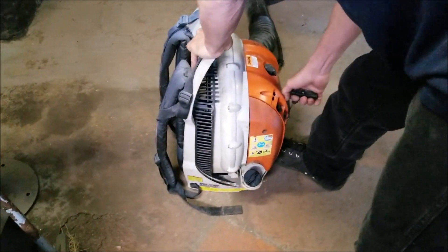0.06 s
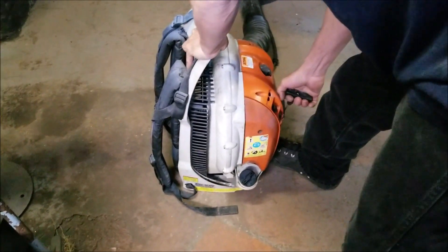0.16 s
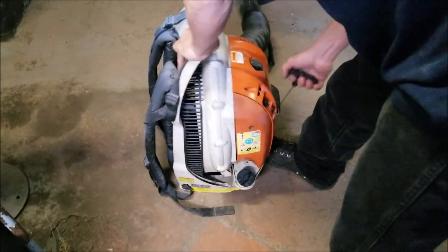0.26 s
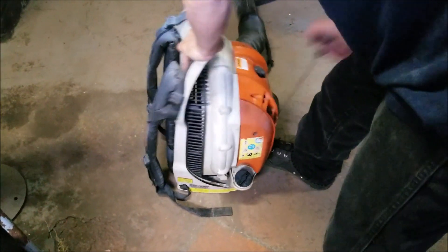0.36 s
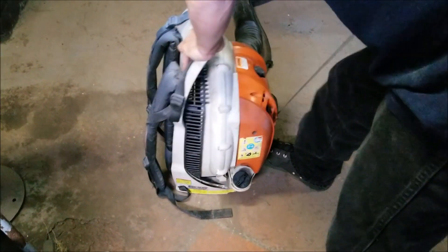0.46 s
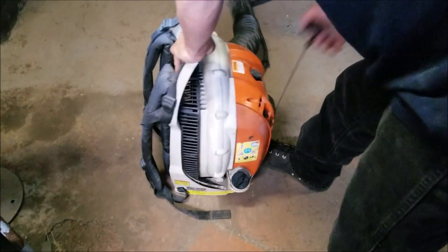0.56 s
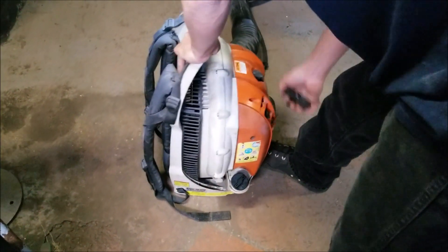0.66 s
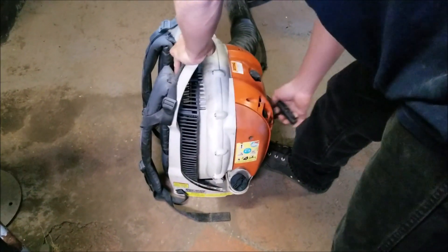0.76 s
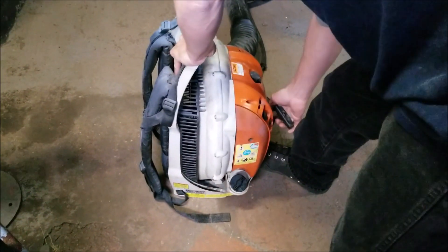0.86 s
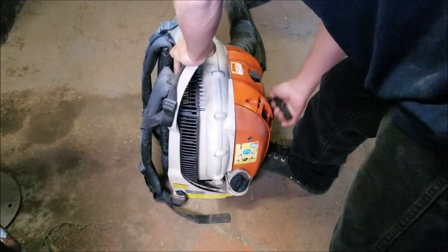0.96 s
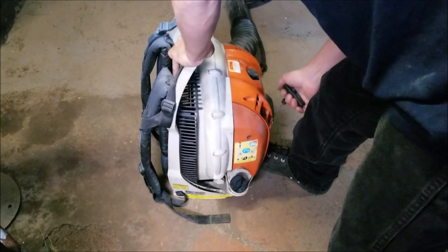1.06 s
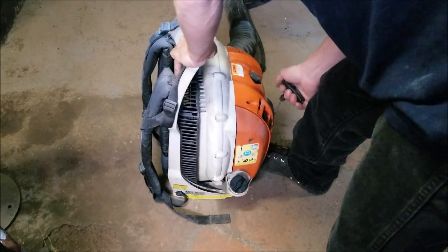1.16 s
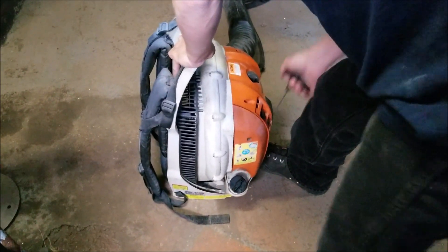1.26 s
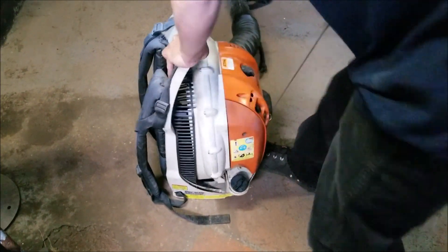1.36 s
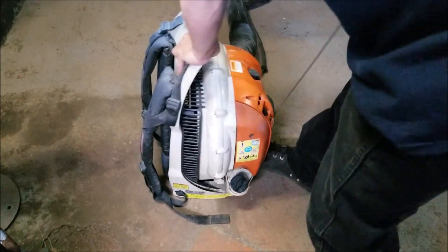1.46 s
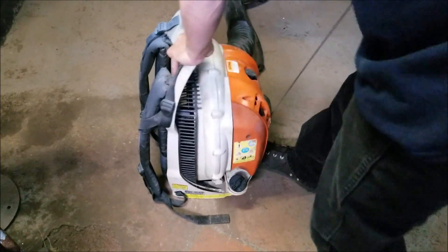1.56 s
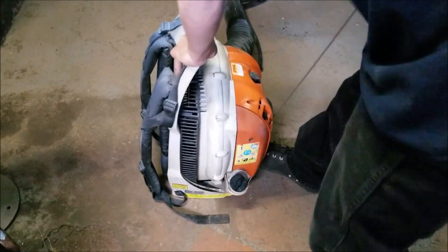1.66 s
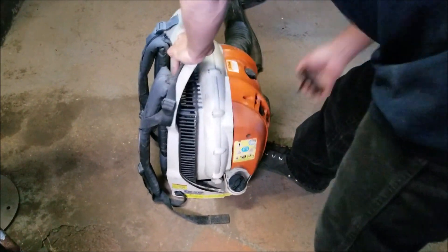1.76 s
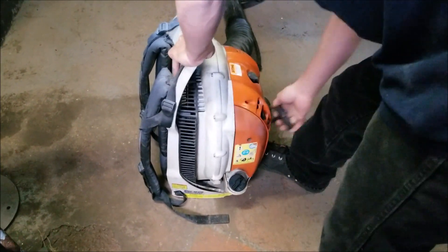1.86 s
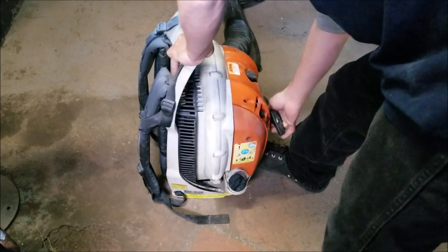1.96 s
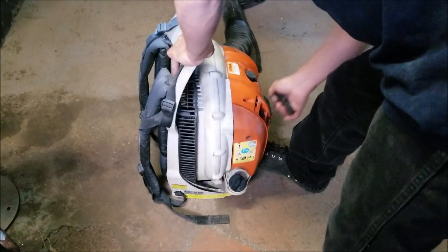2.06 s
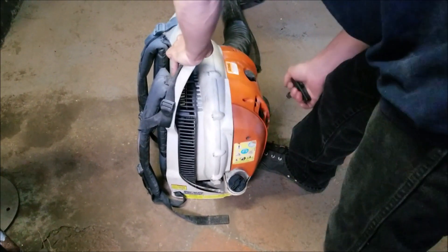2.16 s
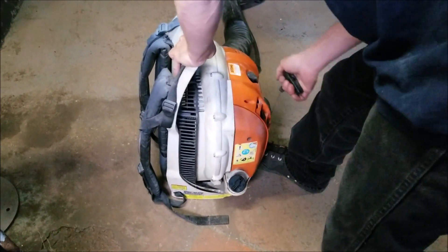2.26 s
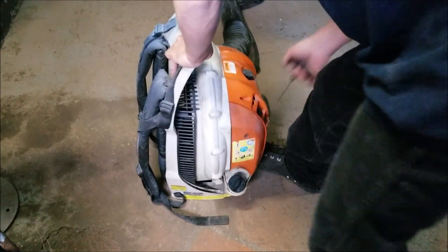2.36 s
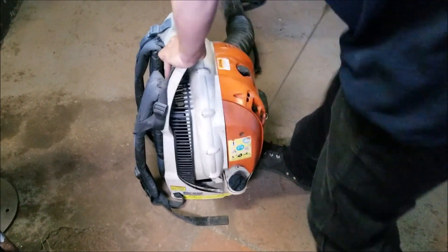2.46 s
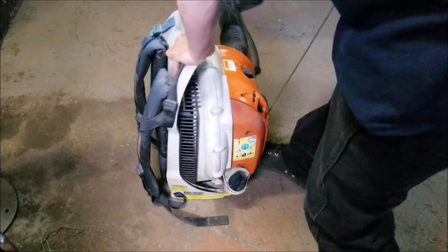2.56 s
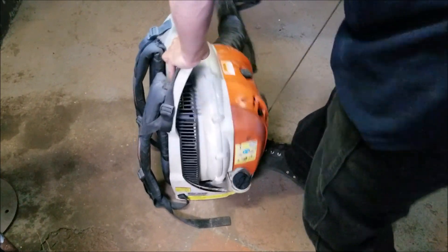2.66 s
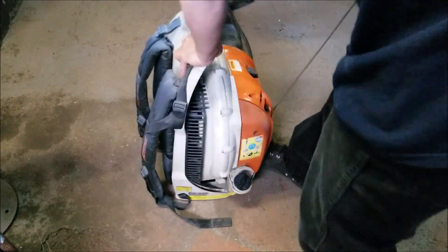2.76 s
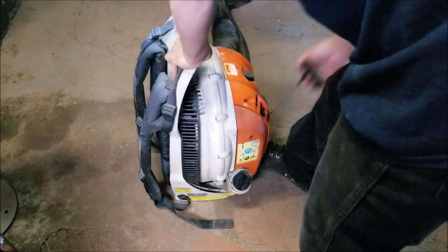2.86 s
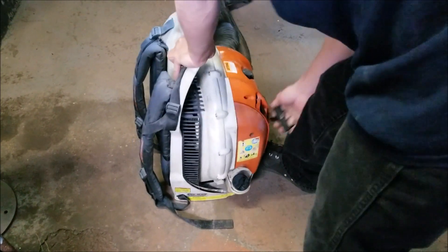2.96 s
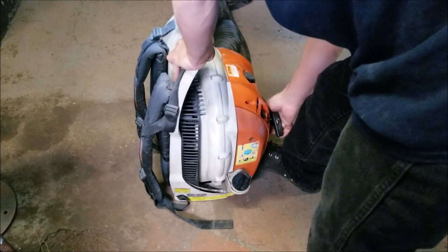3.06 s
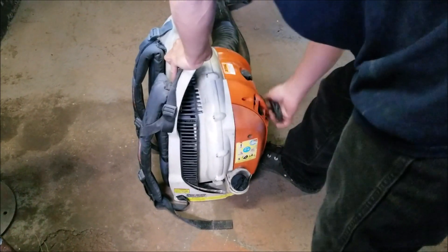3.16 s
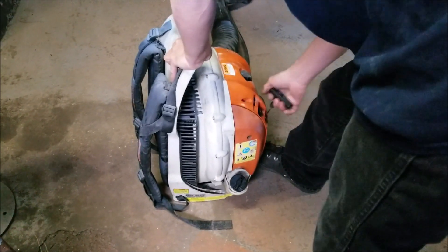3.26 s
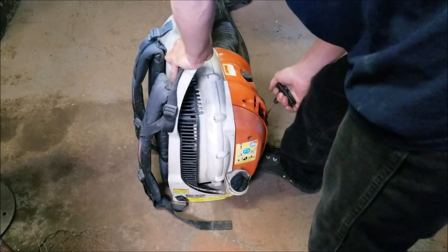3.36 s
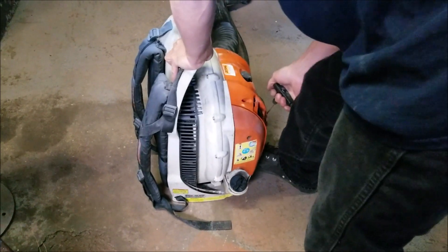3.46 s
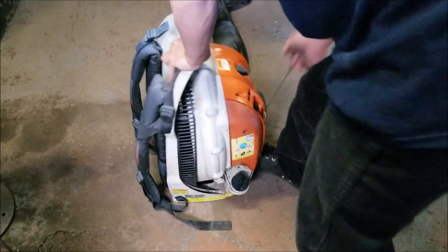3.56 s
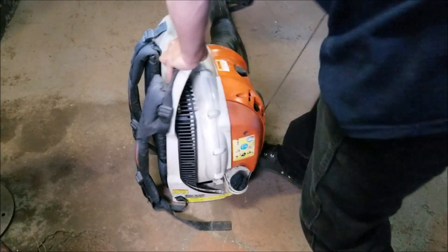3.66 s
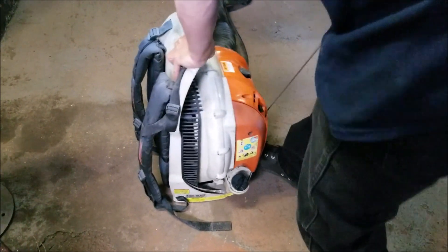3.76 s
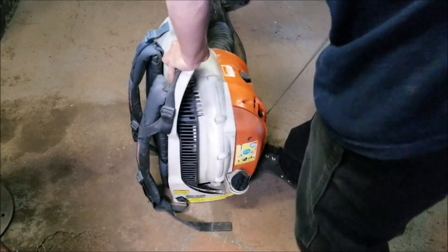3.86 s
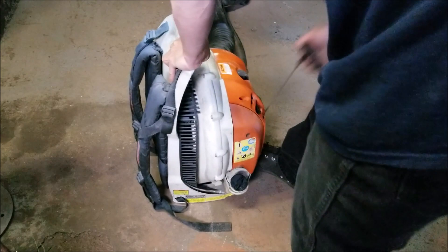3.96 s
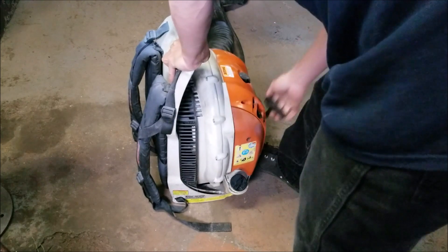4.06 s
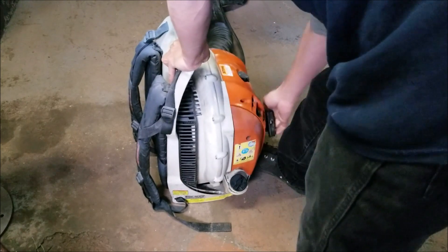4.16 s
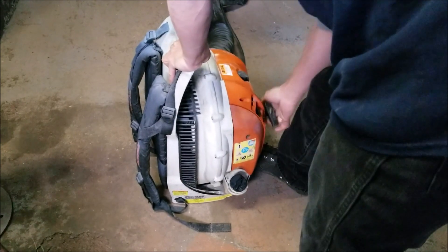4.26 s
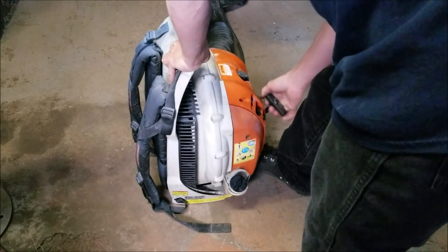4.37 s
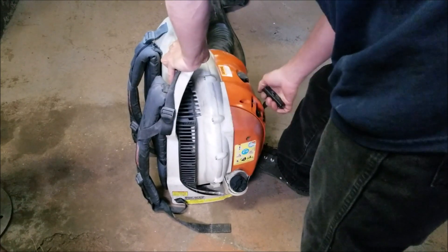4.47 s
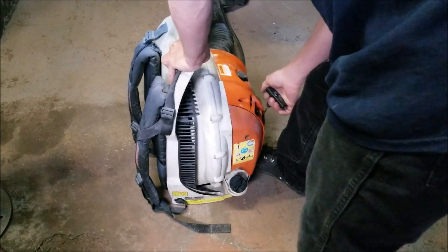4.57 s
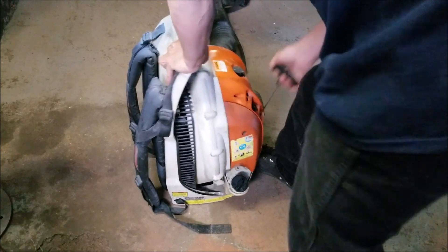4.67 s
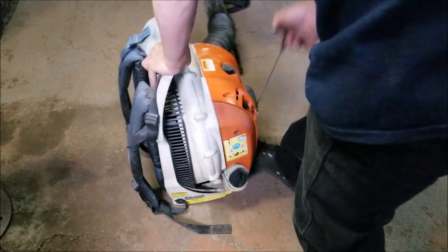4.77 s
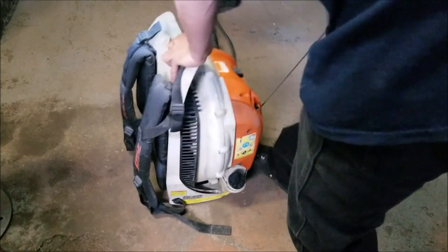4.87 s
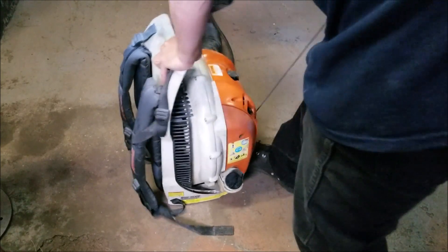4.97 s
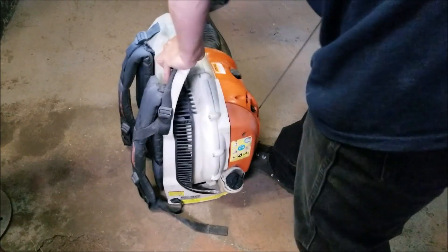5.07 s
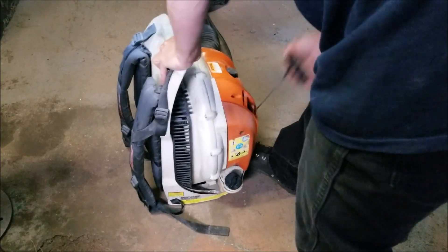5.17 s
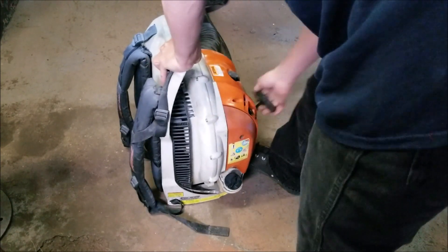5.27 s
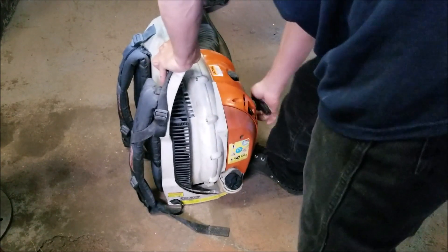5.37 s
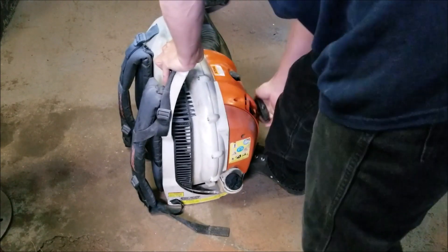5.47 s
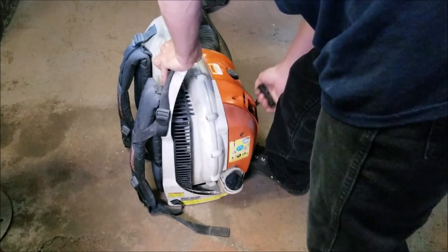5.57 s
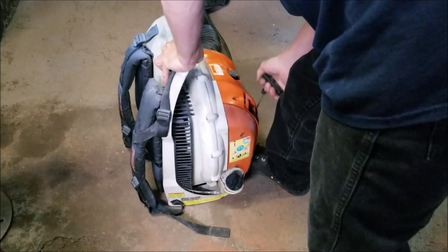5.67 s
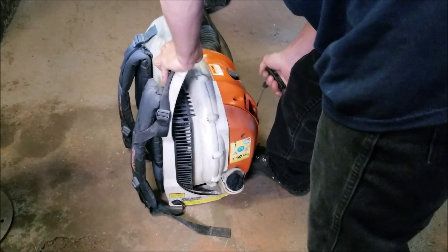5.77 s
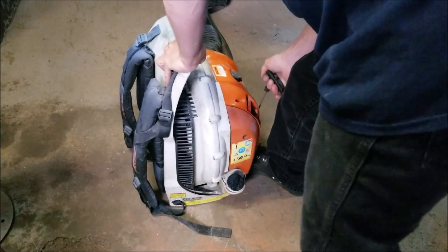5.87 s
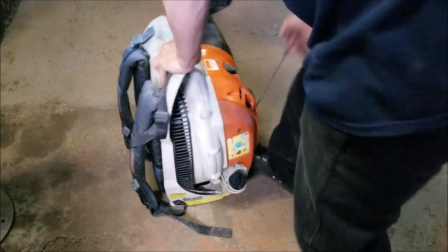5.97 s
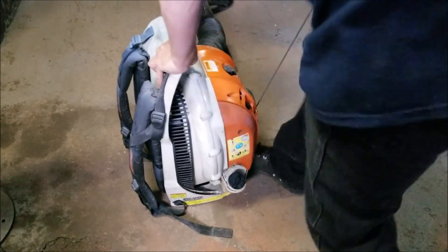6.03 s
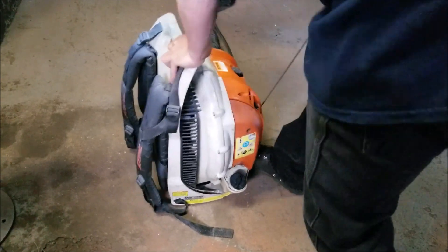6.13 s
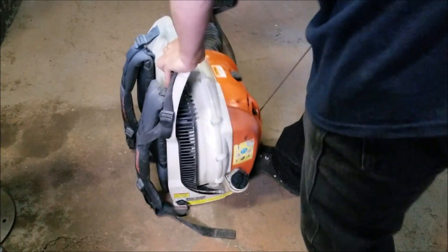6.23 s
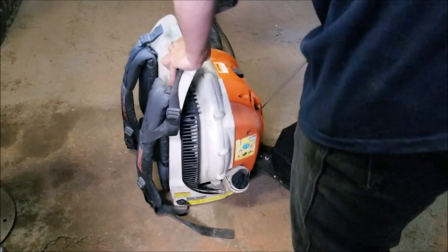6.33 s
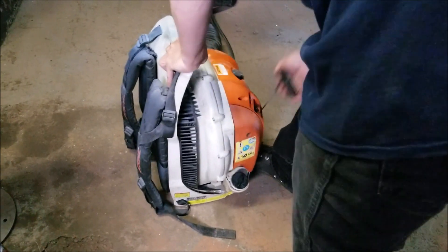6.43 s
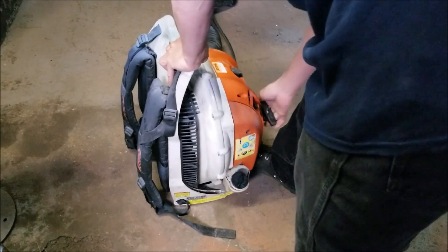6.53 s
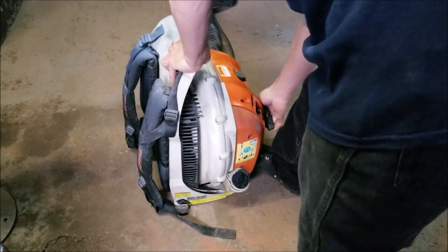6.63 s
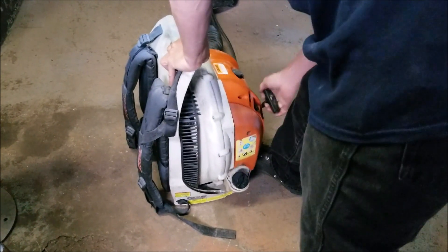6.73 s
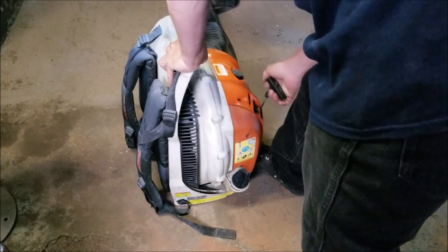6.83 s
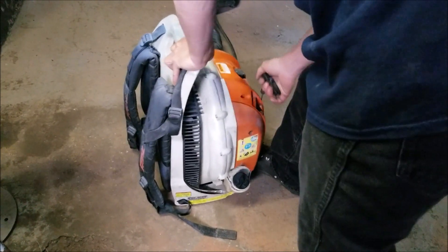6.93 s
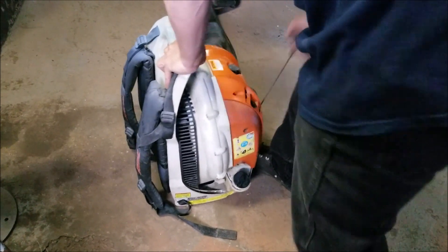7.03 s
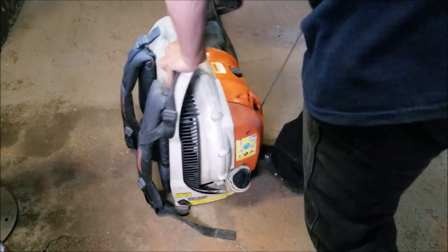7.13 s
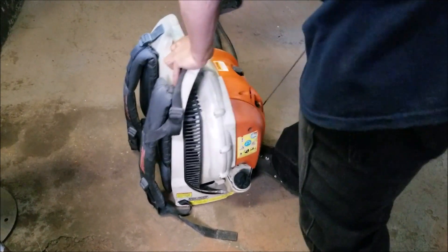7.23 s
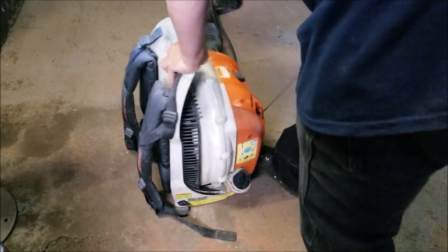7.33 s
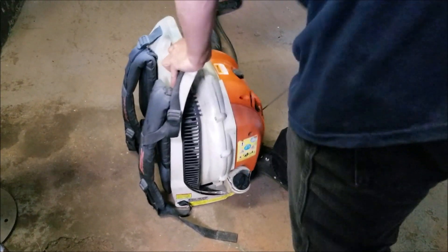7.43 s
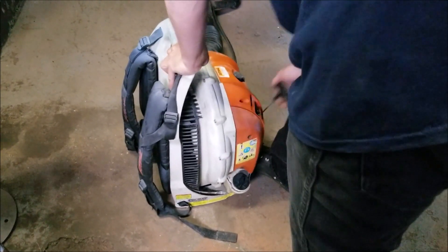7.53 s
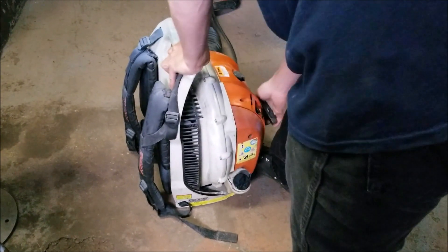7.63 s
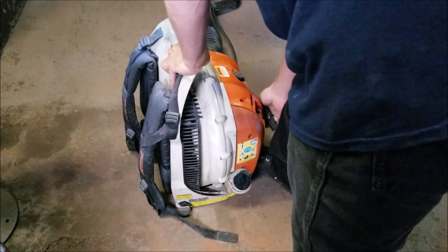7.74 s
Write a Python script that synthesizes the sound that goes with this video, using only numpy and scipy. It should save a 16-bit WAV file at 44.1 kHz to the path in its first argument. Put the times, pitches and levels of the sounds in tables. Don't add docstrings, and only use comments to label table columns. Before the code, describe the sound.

A small two-stroke engine is pulled repeatedly on a concrete workshop floor, heard close from above in stereo with short, hard room reflections. A brief first yank at 0.3 s gives a loud hollow plastic knock, a juddering buzz and a puff. A clack at 1.0 s leads to a long, hard pull at 1.3 s: rasping cord, whirring flywheel, fan hiss, three or four quick knocks and airy chuffs, then a slowing run-down. Similar pulls follow at 2.4, 3.5 and 4.75 s, with sharp pawl clacks and handle knocks between them. A very thin, high bearing whistle breaks through around 5.0-5.25 s. A strong pull at 6.0 s runs down slowly; a weak tug clacks at 6.7 s, and the last full yank comes at 7.05 s. The engine never fires; small knocks and low hum remain until about 7.8 s.

```python
import sys
import numpy as np
from scipy import signal
from scipy.fft import rfft, irfft, next_fast_len
from scipy.io import wavfile
from scipy.ndimage import uniform_filter1d, map_coordinates

SR = 44100
rng = np.random.default_rng(int(sys.argv[2]) if len(sys.argv) > 2 else 0)


def persist_wave(psi):
    counts = np.round(np.clip(psi, -1, 1) * 32767).astype(np.int16)
    wavfile.write(sys.argv[1], SR, np.atleast_2d(counts).T)


def boost_factor(decibels):
    exponent = np.asarray(decibels, float) / 20
    return 10 ** exponent


N = 343980
TIME = np.arange(N) / SR
COARSE = np.arange(0, N / SR + .002, .001)

# cord bites or runs back in s, full speed in s, let
# go or home in s, rasp at full speed in dB, run-down in dB per s.
PULLS = [
    (0.309, 0.388, 0.47, -33, 75),
    (1.29, 1.46, 1.517, -29, 45.5),
    (2.388, 2.52, 2.784, -33.5, 51),
    (3.52, 3.675, 3.84, -32, 47),
    (4.75, 4.86, 4.972, -32, 54),
    (5.999, 6.08, 6.192, -30, 39),
    (7.037, 7.153, 7.28, -32, 45),
    (6.715, 6.769, 6.85, -44, 57),
]
# start in s, kick in dB, ring in Hz, puff in dB.
TURNS = [(0.333, -5.5, 604, -33), (0.483, -15, 897, -25.5), (1.403, -13, 590, -10.5),
         (1.495, -13.5, 700, -8.5), (1.597, -19, 620, -13), (1.75, -26, 680, -44), (1.902, -30.5, 530, -57),
         (2.488, -15, 640, -10.5), (2.575, -26, 680, -10), (2.666, -16.5, 684, -12.5),
         (2.788, -23, 730, -32), (2.967, -31.5, 673, -53), (3.676, -16.5, 620, -6.5),
         (3.764, -21, 670, -10), (3.861, -23.5, 620, -13.5), (4.021, -20.5, 693, -26.5),
         (4.16, -31.5, 620, -39), (4.776, -11.5, 665, -15.5), (4.885, -19, 570, -17.5),
         (4.997, -23, 600, -20.5), (5.161, -24, 675, -31.5), (5.344, -35.5, 690, -46),
         (6.047, -14.5, 597, -12), (6.137, -25, 600, -10.5), (6.229, -19.5, 680, -15),
         (6.36, -21, 727, -33), (7.105, -18, 680, -12), (7.201, -23, 630, -13), (7.3, -21, 705, -15.5),
         (7.456, -18.5, 660, -25)]
# start in s, peak in dB, ring in Hz,
# bright share in dB.
BLOWS = [(.205, -49, 746, -10), (.665, -37, 960, 3), (1.002, -19, 1302, -8.5), (1.275, -20.5, 573, -4),
         (2.066, -24.5, 693, -12), (2.344, -52.5, 684, 6), (3.073, -50.5, 690, 15),
         (3.245, -25.5, 600, -12), (3.531, -14, 712, -14), (3.595, -26.5, 626, -3.5),
         (4.339, -16, 667, -16.5), (4.652, -38, 620, -7), (4.832, -13, 623, -9), (5.257, -28.5, 535, -8.5),
         (5.515, -41, 710, -9), (5.633, -32.5, 1135, -12.5), (5.922, -17.5, 679, -6.5),
         (5.999, -23, 446, -11.5), (6.543, -32, 670, -3.5), (6.691, -41, 580, 0), (6.736, -14, 664, -16),
         (6.825, -35, 480, 1.5), (6.979, -21, 600, -9.5), (7.561, -31.5, 500, -4), (4.103, -40, 634, -6),
         (4.605, -54, 699.1, -4), (5.79, -58, 704, -1), (7.74, -40.5, 600, -2.5), (.368, -26, 600, -1.5)]
# start in s, peak in dB, t60 in s, top share in dB.
LEAKS = [(.251, -36, 0.11, -13), (0.322, -33, .02, -6), (.3706, -21.5, 0.063, -6),
         (0.4245, -18, 0.054, -14), (.484, -9.5, 0.027, -12), (0.7166, -25, 0.05, -10),
         (0.986, -32, 0.056, -4.5), (1.2748, -17.5, .09, -14), (1.3267, -16, 0.036, -15),
         (1.35, -14, 0.034, -25), (1.8494, -23.5, 0.11, -23), (2.051, -29.5, .042, -14),
         (2.3466, -40, 0.1, -14), (2.4305, -18.5, 0.065, -15), (3.073, -26.5, 0.11, -37),
         (3.226, -36.5, 0.23, -11), (3.527, -35.5, .18, -6), (3.5803, -10.5, 0.024, -19),
         (3.6358, -9.5, 0.049, -12.5), (4.334, -35, 0.19, -9.5), (4.808, -9, 0.061, -17.5),
         (5.55, -40.5, 0.083, -23), (5.631, -43, 0.084, -11), (5.9088, -40.5, 0.54, -3.5),
         (5.993, -19.5, 0.1, -18), (6.4795, -19.5, 0.088, -16), (6.733, -29, 0.12, -7),
         (6.827, -18.5, .11, -31), (6.98, -34, 0.15, -11), (7.0373, -19, 0.057, -21)]
# peak in s, length in s, slips per second in Hz, judder in dB, rumble in dB.
JOLTS = [(0.268, 0.13, 180, -35, -38), (0.421, 0.091, 276, -21, -28.5), (1.06, 0.14, 180, -60, -36),
         (1.341, 0.12, 276.5, -29.5, -24.5), (1.542, 0.077, 200, -31, -28.5),
         (2.407, 0.067, 179, -32.5, -38.5), (2.81, 0.13, 270, -43, -27), (2.934, 0.087, 202.3, -35, -40),
         (3.61, .14, 276, -29, -26.5), (3.778, 0.092, 197, -60, -29), (4.122, 0.075, 207, -36, -32),
         (4.685, 0.1, 180.8, -37.5, -39), (4.87, 0.22, 196, -38, -29), (4.918, 0.12, 167.3, -29, -44),
         (5.985, 0.099, 170, -20.5, -26), (6.785, 0.11, 205, -66, -38), (7.046, 0.088, 170, -28.5, -34),
         (7.23, 0.056, 200, -60, -27.5), (7.584, 0.11, 200, -60, -35)]
# peak in s, level in dB.
THUMPS = [(.03, -50), (.4, -38), (.75, -48.5), (1.1, -46.5), (1.54, -42.5), (2.58, -46), (3.72, -50),
          (4.05, -45), (4.84, -41.5), (6.78, -49), (7.17, -43)]
# time in s, pitch in Hz, level in dB.
SQUEAL = [
    (5.0, 13565, -62),
    (5.038, 13600, -50),
    (5.212, 13300, -46),
    (5.27, 13900, -82),
]
# centre in Hz, width in Hz, level in dB.
HOUSING = [(600, 29, -47), (684, 15, -14), (838, 87, -4), (1405, 48, -0.5), (1838, 42, -3), (2700, 83, -14),
           (3130, 62, -38), (4100, 540, -52)]
# centre in Hz, width in Hz, level in dB.
FRAME = [(170, 25.6, -1), (215, 22, -1), (269.5, 12.8, 0.5), (326.8, 13, 1.5), (483, 275, -10.5)]
# centre in Hz, width in Hz, level in dB.
SLAB = [(56.4, 18, 1), (100, 17, 10)]
# frequency in Hz, level in dB per Hz.
RASP = [(210, -24), (350, -11), (423, -3.5), (690, 1.5), (824, -12.5), (1700, -7.5), (1840, -5.5),
        (5000, -24.5), (6500, -25), (11000, -120)]
# frequency in Hz, level in dB per Hz.
AIR = [(1470, -15), (2500, -2.5), (3240, -6.5), (4110, -5.5), (5020, -12.5), (6270, -5.5), (7650, -12.5),
       (11200, -9), (14300, -17), (15600, -16.5)]
# frequency in Hz, level in dB per Hz.
QUIET = [(15, -62), (25, -14), (234, -3), (360, -2.5), (524, -4), (600, -6.5), (668, -58), (724, -6),
         (1060, -39), (7340, -54), (15600, -30)]
# frequency in Hz, t60 in s.
ROOM = [(150, 1), (700, 0.38), (2000, 0.44), (5000, 0.46), (13000, 0.12)]
# frequency in Hz, left-right likeness from 0 to 1.
ALIKE = [(30, 0.64), (150, 0.97), (300, 0.92), (600, 0.74), (1200, 0.1), (4000, 0.012), (14000, 0.011)]
# frequency in Hz, left over right in dB.
LEAN = [(60, 2.5), (300, 3.5), (600, 1.3), (1400, 5), (4000, 1.5), (9000, 3.5), (14000, 2)]

FULL_DB = -32
BITE_RASP_DB, BITE_HISS_DB = -9.5, -11
HISS_DB, HISS_GROWS = -32, 1.53
RUMBLE_DB, RUMBLE_GROWS, RUMBLE_REST_DB = -35.5, 0.63, -55.5
THUMP_DB, THUMP_GROWS, THUMP_REST_DB = -55.5, 0.62, -60
THUMP_RISE_S, THUMP_FALL_S = 0.045, .12
KICK_BRIGHT_DB, KICK_SOFTENS = -9, 0.37
REBOUND_S, REBOUND_SHARE, REBOUND_DB = .02, .16, -16.5
REBOUND_HZ, REBOUND_BRIGHT_DB = 686, -12
EXHAUST_S, INTAKE_S, INTAKE_SHARE, INTAKE_DB = 0.013, .015, .39, -1
PUFF_T60_S, PUFF_SLOWS, PUFF_LONGEST_S, PUFF_TOP_DB = 0.058, 0.3, 0.094, -17.5
JUDDER_EDGE_DB, JOLT_EDGE_DB, JOLT_TRAILS = -19, -15, 2.14


def turns():
    s, kick_db, hz, puff_db = np.transpose(TURNS)
    gap = np.diff(s, append=np.inf)
    return s, np.where(gap < .25, gap, .17), kick_db, hz, puff_db


def speed_db(bite_db):
    runs = []
    for s, full, go, db, sag in PULLS:
        wind_up = np.interp(COARSE, [s, s + .02, full, go], [-45, bite_db, 0, 0], -90)
        runs.append(db - FULL_DB + wind_up - sag * np.maximum(COARSE - go, 0))
    return powers(*runs)


def blows():
    s, span, db, hz, _ = turns()
    back = s + REBOUND_S + REBOUND_SHARE * span
    back_db = REBOUND_DB + np.minimum(np.interp(back, COARSE, speed_db(BITE_RASP_DB)), 0)
    kicks = np.transpose([s, db, hz, KICK_BRIGHT_DB - KICK_SOFTENS * (db + 19)])
    rebounds = np.transpose([back, back_db, REBOUND_HZ + 0 * s, REBOUND_BRIGHT_DB + 0 * s])
    return [*kicks, *rebounds, *BLOWS]


def knocks():
    out, t = np.zeros((2, N + SR)), np.arange(SR // 8) / SR
    for s, db, hz, bright_db in blows():
        fade = boost_factor(-60 * t / 0.013) + 0.5 * boost_factor(-60 * t / 0.21)
        push = rng.standard_normal((2, len(t))) * fade * (1 - np.exp(-t / 0.00053))
        phase = rng.uniform(0, 2 * np.pi, (3, 2, 1))
        below = np.sin(2 * np.pi * .84 * hz * t + phase[1])
        above = np.sin(2 * np.pi * 1.22 * hz * t + phase[2])
        panel = np.sin(2 * np.pi * hz * t + phase[0]) + 0.32 * (below + above)
        panel *= (t / .004) * np.exp(1 - t / .004)
        struck = [(c * (1 + rng.normal(0, 0.064)), 4 * w, g + rng.normal(0, 2.4)) for c, w, g in HOUSING[2:]]
        body = lambda f: np.hypot(np.abs(modes(struck)(f)), 0.27 * (f > 400))
        crack = filtered(push, lambda f: body(f) / (1 + 1j * f / 3500) ** 2)
        crack = crack / np.abs(crack).max()
        blow = boost_factor(db - 7) * panel + boost_factor(db + bright_db + 10.5) * crack
        out[:, round(s * SR):][:, :len(t)] += blow
    return out[:, :N]


def openings():
    s, span, _, _, db = turns()
    s = np.r_[s + EXHAUST_S, s + INTAKE_S + INTAKE_SHARE * span]
    db = np.r_[db, db + INTAKE_DB]
    t60 = np.minimum(PUFF_T60_S * boost_factor(-PUFF_SLOWS * (db + 8.5)), PUFF_LONGEST_S)
    top_db = PUFF_TOP_DB + 2 * rng.standard_normal(len(s))
    return [*np.transpose([s, db, t60, top_db]), *LEAKS]


def puffs():
    power, t = np.zeros((2, N + SR)), np.arange(SR // 4) / SR
    for s, db, t60, top_db in openings():
        rush = boost_factor(-120 * t / max(t60, .01)) * (1 - np.exp(-t / 0.015))
        tick = 0.27 * np.exp(-t / 0.0015)
        share_db = np.array([[0], [top_db + 18]])
        power[:, round(s * SR):][:, :len(t)] += boost_factor(2 * db + 2 * share_db) * (rush + tick)
    air = patchy(noise(AIR), depth_db=3.5)
    top = filtered(air, lambda hz: 1 / (1 + (9500 / (hz + 1)) ** 8))
    main_level, top_level = np.sqrt(power[:, :N])
    return boost_factor(-7.5) * (main_level * (air - top) + top_level * top)


def labour_db():
    s = np.r_[turns()[0], np.inf]
    wait = s[np.searchsorted(s, COARSE)] - COARSE
    return -4.5 * np.exp(-wait / .016)


def cord_rasp(run_db, shake):
    level_db = np.interp(TIME, COARSE, FULL_DB + run_db + labour_db())
    grit = rng.standard_normal((2, N)) * boost_factor(1.5 * wobble(200))
    ticks = (rng.random(N) < 85 / SR) * rng.exponential(14, N)
    tick_fade = np.exp(-np.arange(SR // 100) / (.002 * SR))
    grit = grit * np.sqrt(1 + np.convolve(ticks, tick_fade)[:N] / 5)
    shell = filtered(grit, lambda hz: boost_factor(along(RASP, hz)) * np.hypot(.4, np.abs(modes(HOUSING)(hz))))
    return boost_factor(level_db + 1.6 * shake) * patchy(shell, depth_db=1.8)


def fan_hiss(shake):
    level_db = np.interp(TIME, COARSE, HISS_DB + HISS_GROWS * speed_db(BITE_HISS_DB) + labour_db())
    return boost_factor(level_db + 1.06 * shake + 0.9 * wobble(90)) * patchy(noise(AIR), depth_db=2.5)


def jolts_db():
    levels = []
    for s, length, _, _, db in JOLTS:
        early = (np.maximum(s - COARSE, 0) / (length / 2)) ** 2
        late = np.maximum(COARSE - s, 0) / (length / 2 * JOLT_TRAILS)
        levels.append(db + JOLT_EDGE_DB * np.minimum(early + late, 10))
    return powers(*levels)


def frame_rumble(run_db):
    level_db = powers(RUMBLE_DB + RUMBLE_GROWS * run_db, jolts_db(), RUMBLE_REST_DB)
    frame = unit(filtered(rng.standard_normal((2, N)), modes(FRAME)))
    return boost_factor(np.interp(TIME, COARSE, level_db) - 1.0 + 2.41 * wobble(25)) * frame


def slab_thump(run_db):
    rocks = [db - 10 * np.maximum((s - COARSE) / THUMP_RISE_S, (COARSE - s) / THUMP_FALL_S) for s, db in THUMPS]
    level_db = powers(THUMP_DB + THUMP_GROWS * run_db, THUMP_REST_DB, *rocks)
    band = lambda hz: 1 / (1 + (hz / 130) ** 4) / (1 + (45 / (hz + 1)) ** 4)
    slab = unit(filtered(rng.standard_normal((2, N)), lambda hz: modes(SLAB)(hz) * band(hz)))
    return boost_factor(np.interp(TIME, COARSE, level_db) - 1.2) * slab


def spin():
    run_db, shake = speed_db(BITE_RASP_DB), wobble(30)
    return cord_rasp(run_db, shake) + fan_hiss(shake) + frame_rumble(run_db) + slab_thump(run_db)


def judder():
    out = np.zeros(N)
    cycles = np.cumsum(1 + 0.026 * wobble(50)) / SR
    uneven = boost_factor(0.37 * wobble(80))
    for s, length, hz, db, _ in JOLTS:
        near = slice(round((s - length) * SR), round((s + length) * SR))
        phase = 2 * np.pi * hz * cycles[near]
        saw = np.sin(phase) + 0.089 * np.sin(2 * phase) + 0.04 * np.sin(3 * phase) + 0.022 * np.sin(4 * phase)
        swell_db = JUDDER_EDGE_DB * ((TIME[near] - s) / (length / 2)) ** 2
        out[near] += boost_factor(db + swell_db) * saw
    return np.array([out * uneven, np.roll(out * uneven, 70)])


def squeal():
    s, hz, db = np.transpose(SQUEAL)
    pitch = np.interp(TIME, s, hz) + 90 * wobble(400)
    tone = np.sin(2 * np.pi * np.cumsum(pitch) / SR)
    breaking_db = 6 * np.array([wobble(70), wobble(70)])
    return boost_factor(np.interp(TIME, s, db, -120, -120) - 5 + breaking_db) * tone


def shop(x):
    out, step = np.zeros((2, N + 2 * SR)), SR // 4
    for start in range(0, N, step):
        hz, t, z = signal.stft(rng.standard_normal((2, SR * 3 // 5)), SR, nperseg=256)
        fade = boost_factor(-60 * t / along(ROOM, hz)[:, None])
        tail = signal.istft(z * fade, SR, nperseg=256)[1]
        wet = signal.fftconvolve(x[:, start:start + step], tail / np.linalg.norm(tail[0]), axes=1)
        out[:, start + 250:][:, :wet.shape[1]] += wet
    return out[:, :N]


def quiet_place():
    return boost_factor(-58.5) * noise(QUIET)


def unit(x):
    return x / np.sqrt(np.mean(x ** 2) + 1e-20)


def along(points, hz):
    f, v = np.transpose(points)
    return np.interp(np.log(hz + 1), np.log(f + 1), v)


def powers(*levels_db):
    return 10 * np.log10(sum(boost_factor(2 * np.asarray(v)) for v in levels_db))


def filtered(x, response):
    m = next_fast_len(x.shape[-1] + 8192)
    spectrum = rfft(x, m) * response(np.fft.rfftfreq(m, 1 / SR))
    return irfft(spectrum, m)[..., :x.shape[-1]]


def modes(table):
    resonance = lambda f, c, w: 1j * f * w / (c * c - f * f + 1j * f * w)
    return lambda f: sum((-1) ** k * boost_factor(db) * resonance(f, c, w) for k, (c, w, db) in enumerate(table))


def wobble(rate):
    return map_coordinates(rng.standard_normal(int(N * rate / SR) + 4), [TIME * rate])


def noise(spectrum):
    return unit(filtered(rng.standard_normal((2, N)), lambda hz: boost_factor(along(spectrum, hz))))


def patchy(x, depth_db):
    z = signal.stft(x, nperseg=256)[2]
    field = uniform_filter1d(rng.standard_normal(z.shape[1:]), size=5, axis=0)
    field = uniform_filter1d(field, size=8, axis=1)
    return unit(signal.istft(z * boost_factor(depth_db * unit(field)), nperseg=256)[1][:, :N])


def scene():
    hits, shake = knocks() + puffs(), judder()
    wet = boost_factor(-6.5) * shop(hits + .3 * shake)
    pair = hits + shake + wet + spin() + squeal() + quiet_place()
    turn = lambda hz: np.arccos(np.clip(along(ALIKE, hz), -1, 1)) / 2
    mid, side = filtered(pair, lambda hz: np.array([np.cos(turn(hz)), np.sin(turn(hz))]))
    ports = np.array([mid + side, mid - side])
    return filtered(ports, lambda hz: boost_factor(np.outer([.5, -.5], along(LEAN, hz))))


def top_cut(x):
    return signal.sosfilt(signal.butter(12, 16970, fs=SR, output="sos"), x)


def record(dry):
    mix = filtered(dry, lambda hz: np.where(hz < 15850, 1, boost_factor(-65)))
    return top_cut(mix)


dry = scene()
out = record(dry)
persist_wave(out)
```